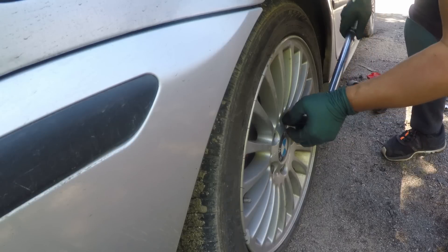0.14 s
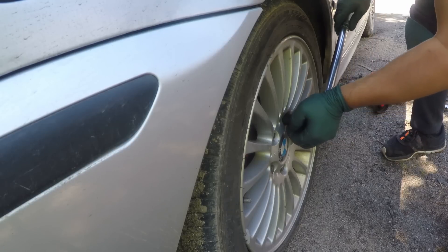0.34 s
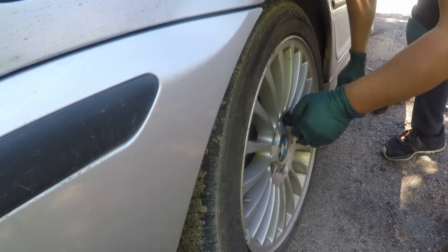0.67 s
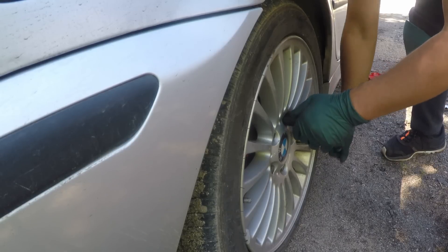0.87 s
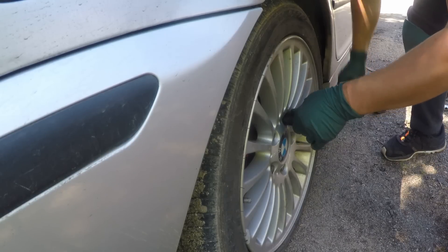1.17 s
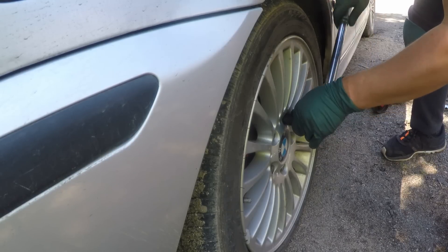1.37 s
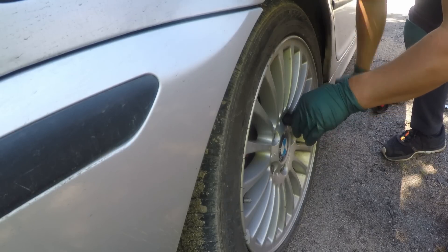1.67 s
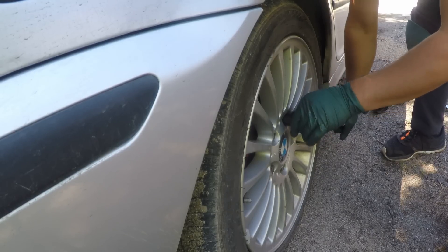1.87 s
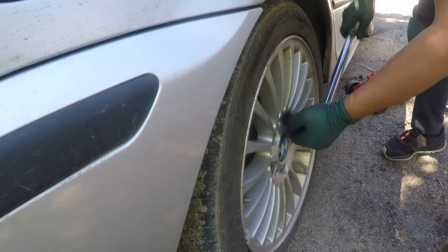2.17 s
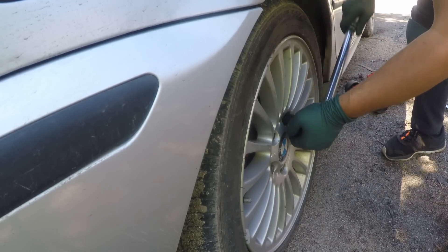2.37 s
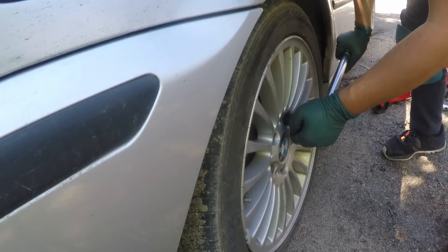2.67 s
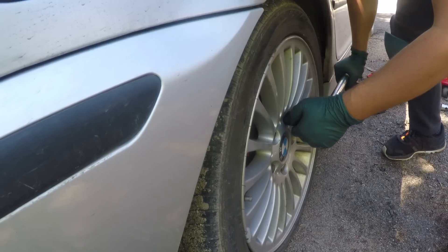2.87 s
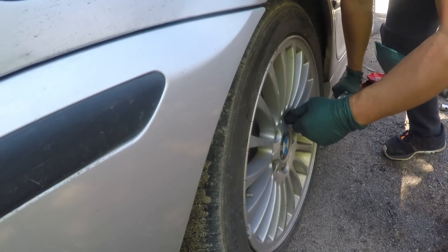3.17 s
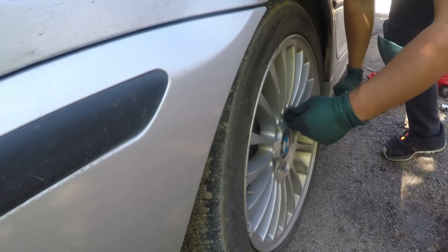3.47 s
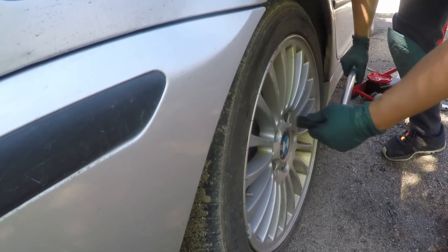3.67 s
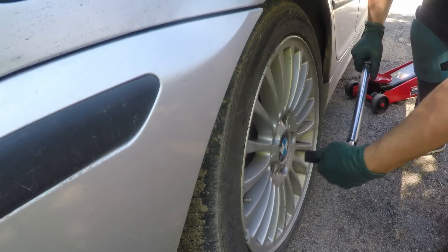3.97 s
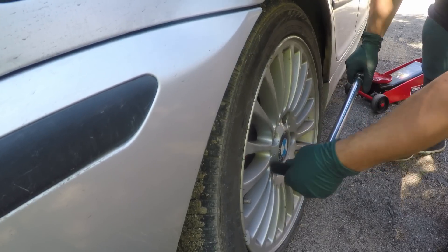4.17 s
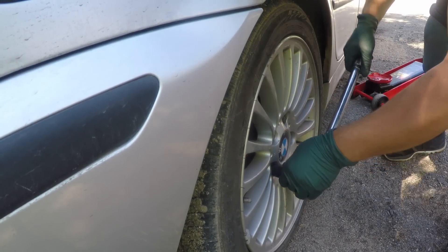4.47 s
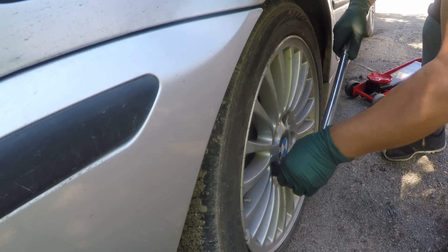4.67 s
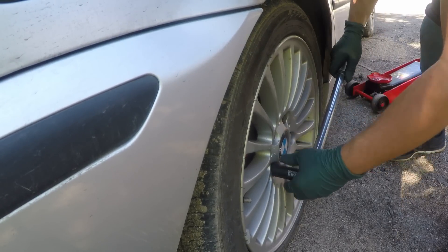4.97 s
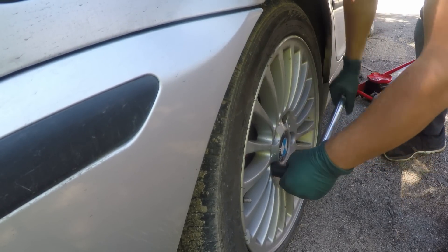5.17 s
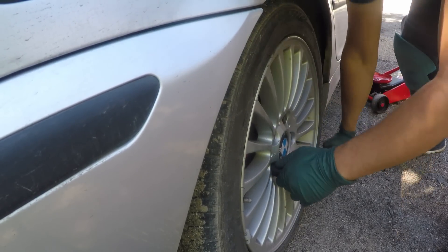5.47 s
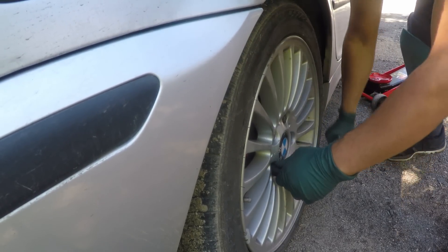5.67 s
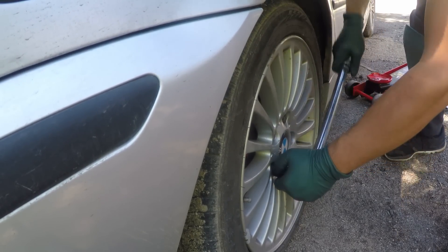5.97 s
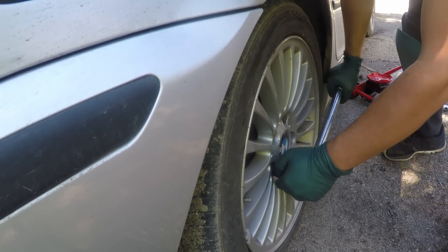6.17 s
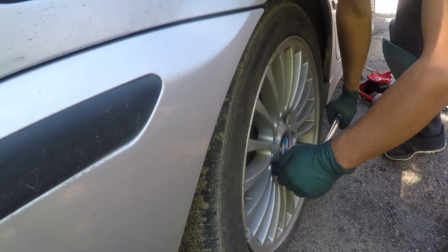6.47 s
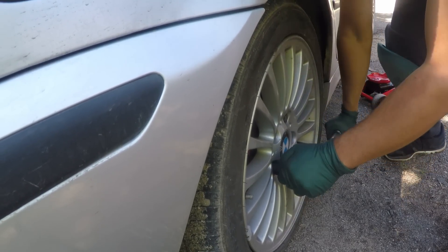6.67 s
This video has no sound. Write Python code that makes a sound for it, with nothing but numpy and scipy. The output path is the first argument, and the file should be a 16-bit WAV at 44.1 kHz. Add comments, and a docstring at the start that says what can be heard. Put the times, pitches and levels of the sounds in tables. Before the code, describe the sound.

A wrench ratchets in crisp steel tick bursts on wheel bolts, then snaps hard twice per bolt, over a distant engine outdoors.

```python
"""Ratchet ticks come first, over a distant engine and soft outdoor air: wheel bolts are being tightened.
Each tick is a noisy steel slap plus a ringing tool head and socket; the socket also knocks in the alloy wheel.
At the set torque the wrench snaps over, then snaps back: a burst of noise that rings tool, hub and tyre.
Some way off a vehicle speeds up, eases and goes by: sine tones tied to engine speed, and swelling noise.
A bird calls faintly in short falling whistles, and a thin hum wavers behind the engine."""
import sys
import numpy as np
from scipy import signal
from scipy.fft import rfft, irfft, next_fast_len
from scipy.io import wavfile
from scipy.ndimage import uniform_filter1d

SR = 44100
rng = np.random.default_rng(int(sys.argv[2]) if len(sys.argv) > 2 else 0)


def dump(signal):
    """Clip the signal to [-1, 1] and save it as 16-bit WAV at the path in sys.argv[1]."""
    limited = np.clip(np.atleast_2d(signal).T, -1, 1)
    pcm = np.round(limited * 32767).astype(np.int16)
    wavfile.write(sys.argv[1], SR, pcm)


N = 301203
TIME = np.arange(N) / SR  # the whole scene [s]
RING = np.arange(SR // 3) / SR  # time within one short sound [s]


def undb(db):
    """Turn decibels into gain."""
    return 10 ** (np.asarray(db) / 20)


def unit(x):
    """Scale to an rms (average strength) of 1."""
    return x / np.sqrt(np.mean(x ** 2))


def add(track, at, sound):
    """Mix a sound in at a time in seconds."""
    i = int(np.clip(at * SR, 0, N - 1))
    track[i:i + len(sound)] += sound[:N - i]


def colour(x, points, tilt_db=0):
    """Filter through (Hz, dB) points, tilted about 4096 Hz by tilt_db per octave, with no sound before its cause."""
    n = 2 * next_fast_len(len(x))
    octave = np.log2(np.maximum(np.arange(n // 2 + 1) * SR / n, 1))
    hz, db = np.transpose(points)
    # the tilt acts from one octave below the middle to two above
    gain_db = np.interp(octave, np.log2(hz), db) + tilt_db * np.clip(octave - 12, -1, 2)
    # folding the cepstrum forward in time makes the filter minimum phase
    cepstrum = irfft(np.log(undb(gain_db)))
    cepstrum[1:n // 2] *= 2
    cepstrum[n // 2 + 1:] = 0
    response = np.exp(rfft(cepstrum))
    return irfft(rfft(x, n) * response)[:len(x)]


def fade(t, t60):
    """Die away exponentially, losing 60 dB in t60 seconds."""
    return np.exp(-np.log(1000) * np.maximum(t, 0) / t60)


def walk(rate):
    """Wander smoothly at random with rms 1, from new values drawn rate times a second."""
    k = int(SR / rate)
    steps = np.repeat(rng.standard_normal(N // k + 1), k)
    smooth = uniform_filter1d(uniform_filter1d(steps, k), k)
    return unit(smooth[:N])


def ring(modes, scatter_db=0.5, detune=0.0027, build_s=0.00055):
    """Sum fading sine tones (modes); every blow weights and detunes them a little differently."""
    hz, db, t60 = np.transpose(modes)[:, :, None]
    size, shift, phase = rng.standard_normal((len(modes), 3)).T[:, :, None]
    waves = np.sin(2 * np.pi * (hz * (1 + detune * shift) * RING + phase))
    tones = undb(db + scatter_db * size) * fade(RING, t60) * waves
    return tones.sum(0) * (1 - np.exp(-RING / build_s))


def crack(points, tilt_db, rise_s, chatter_s, t60, after_db, after_t60, ripple_db=3.5):
    """Steel chatters on steel for a moment, then its crowd of modes dies in a fast and a slower stage."""
    since = RING - chatter_s
    decay = np.hypot(fade(since, t60), undb(after_db) * fade(since, after_t60))
    envelope = np.minimum(RING / rise_s, 1) * decay
    # each contact point favours other modes
    hz = np.arange(100, 16000, 150)
    db = np.interp(hz, *np.transpose(points)) + ripple_db * rng.standard_normal(len(hz))
    burst = colour(rng.standard_normal(len(RING)) * envelope, np.transpose([hz, db]), tilt_db)
    return unit(burst) * np.sqrt(np.mean(envelope ** 2))


# tone of the outdoor noise: (frequency [Hz], level [dB])
AIR_TONE = [(12, -28.5), (20, -3), (76, -2.5), (97, -6), (132, -11.5), (183, -14), (223, -14), (263, -20.5),
            (302, -21), (511, -26.5), (940, -30), (1930, -43), (2410, -44.5), (6180, -55.5), (15000, -68)]
# air from low to high (rumble, murmur of traffic, tyre noise, hiss):
# (steady level [dB], level of the vehicle at its nearest [dB], flicker [dB])
AIR_LAYERS = [(-35.5, -34.5, 2.1), (-55, -51, 1.5), (-57, -45.5, 1.07), (-53, -56.5, 1.3)]
# the vehicle is nearest from this time, for this long; its noise grows slowly and drops fast
PASS_S, PASS_HOLD_S = 3.55, .5
APPROACH_DB_PER_S, LEAVE_DB_PER_S = 11, 28


def air():
    """Filtered noise makes rumble, far road noise and hiss; they swell as the vehicle goes by."""
    before_s = np.maximum(PASS_S - TIME, 0)
    after_s = np.maximum(TIME - PASS_S - PASS_HOLD_S, 0)
    away_db = APPROACH_DB_PER_S * before_s + LEAVE_DB_PER_S * after_s
    bands = [(260, "lowpass"), ((260, 480), "bandpass"), ((480, 880), "bandpass"), (880, "highpass")]
    out = np.zeros(N)
    for (edge_hz, kind), (steady_db, pass_db, flicker_db) in zip(bands, AIR_LAYERS):
        band = signal.butter(4, edge_hz, kind, fs=SR, output="sos")
        noise = signal.sosfilt(band, colour(rng.standard_normal(N), AIR_TONE))
        swell = np.hypot(undb(steady_db), undb(pass_db - away_db))
        out += unit(noise) * swell * undb(flicker_db * walk(6.5))
    return out


# a faint far-off hum: (time [s], pitch [Hz], level before wavering [dB])
HUM_PATH = [(0, 196.8, -58.5), (1.3, 197.5, -51), (2.501, 212, -58.5), (4.2, 220, -57), (6.83, 218, -53)]


def hum(waver_db=2):
    """One sine tone glides in pitch and wavers in level behind the engine."""
    s, hz, db = np.transpose(HUM_PATH)
    phase = 2 * np.pi * np.cumsum(np.interp(TIME, s, hz)) / SR
    level_db = np.interp(TIME, s, db) + waver_db * walk(1.7)
    return np.sqrt(2) * undb(level_db) * np.sin(phase)


# the distant engine speeds up, eases off and runs on: (time [s], firing rate [Hz])
FIRING_RATE = [(0, 65.44), (.9, 76.7), (1.75, 81.5), (2.5, 84.33), (2.9, 76.7), (3.35, 70.24), (4.2, 71.67),
               (5.7, 73.94), (6.83, 69.5)]
# its firing tone: (time [s], level before gain and flutter [dB])
FIRING_LEVEL = [(0, -34), (.55, -46), (.9, -30), (1.4, -32), (1.73, -24.5), (2.72, -28), (2.91, -19),
                (3.17, -32.5), (3.5, -22.5), (3.8, -34), (3.97, -26), (4.4, -39.5), (4.72, -31),
                (5.1, -40.5), (6.83, -38)]
# its exhaust drone at eight times the cycle rate: (time [s], level [dB])
DRONE_LEVEL = [(0, -43), (.45, -32.5), (.9, -42), (1.6, -42), (2.1, -35), (2.6, -41.5), (3.85, -38.5),
               (4.4, -45), (6.83, -54)]
# weaker engine tones: (multiple of the cycle rate, level against the drone before wavering [dB])
WEAK_ORDERS = [(3, -10.5), (7, -7), (9, -12.5), (10, -14), (16, -17)]
# a thin whine that comes and goes:
# (time at its loudest [s], half length [s], multiple of the cycle rate, level before flutter [dB])
WHINES = [(1.947, 0.18, 73.3, -58.5), (2.077, 0.19, 101, -57)]


def engine(gain_db=-1.5, waver_db=2, flutter_db=1.3):
    """Tones at multiples (orders) of the cycle rate glide together with the engine speed."""
    firing_hz = np.interp(TIME, *np.transpose(FIRING_RATE))
    cycle = 2 * np.pi * np.cumsum(firing_hz) / SR / 5  # five firings per cycle
    firing_db = np.interp(TIME, *np.transpose(FIRING_LEVEL)) + gain_db + flutter_db * walk(11)
    drone_db = np.interp(TIME, *np.transpose(DRONE_LEVEL))
    out = undb(firing_db) * np.sin(5 * cycle) + undb(drone_db) * np.sin(8 * cycle)
    for order, order_db in WEAK_ORDERS:
        level_db = drone_db + order_db + waver_db * walk(4.6)
        out += undb(level_db) * np.sin(order * cycle + 2 * np.pi * rng.random())
    for at, half_s, order, db in WHINES:
        swell = np.exp(-((TIME - at) / half_s) ** 2)
        level = undb(db + 2 * flutter_db * walk(30))
        out += level * swell * np.sin(order * cycle + walk(40))  # the wandering phase roughens it
    return np.sqrt(2) * out


# bird whistles: (time [s], length [s], start pitch [Hz], end pitch [Hz], level before flutter [dB])
WHISTLES = [(0.849, 0.087, 5350, 4630, -61), (0.887, 0.09, 4850, 3650, -62),
            (1.058, 0.044, 3500, 2880, -57)]


def bird(flutter_db=4):
    """Each whistle is a short sine tone that falls in pitch and flutters in level."""
    out = np.zeros(N)
    for at, length_s, start_hz, end_hz, db in WHISTLES:
        hz = np.linspace(start_hz, end_hz, int(length_s * SR))
        whistle = np.sin(2 * np.pi * np.cumsum(hz) / SR)
        add(out, at, undb(db) * np.hanning(len(hz)) * whistle)
    return out * undb(flutter_db * walk(121.2))


# tone of light contacts and knocks: (frequency [Hz], level [dB])
KNOCK_TONE = [(200, -11), (700, -8.5), (1100, 3.5), (2000, 0.5), (3200, 1), (5000, -5), (7500, -17.5),
              (10500, -23), (14500, -26)]
# the tool shifting and scraping in the glove: (time [s], level [dB], length of the chatter [s])
TOOL_TAPS = [(0.387, -50.5, .002), (1.556, -45, 0.0054), (2.429, -47.5, 0.0021), (3.651, -46.5, 0.0037),
             (3.7384, -41, .002), (4.0606, -41, .003), (5.438, -54.5, 0.022), (5.465, -50.5, .014),
             (5.702, -51, 0.016), (6.0047, -49, .002), (6.1934, -46.5, 0.0042), (6.536, -56, 0.025)]


def taps():
    """The tool shifts lightly between strokes: quiet bursts of contact noise."""
    out = np.zeros(N)
    for at, db, length_s in TOOL_TAPS:
        tap = crack(KNOCK_TONE, tilt_db=0.0, rise_s=0.0007, chatter_s=length_s,
                    t60=0.035, after_db=-6.5, after_t60=0.19)
        add(out, at, undb(db) * tap)
    return out


# modes of the socket seated on its bolt: (frequency [Hz], level [dB], t60 [s])
SOCKET_MODES = [(1015, 2, 0.041), (1183, -5.5, 0.17), (1580, 0, 0.059), (2270, -12, 0.074),
                (3070, -10, 0.039), (3260, -9, 0.045)]
# modes of the alloy wheel: (frequency [Hz], level [dB], t60 [s])
WHEEL_MODES = [(175, -6, 0.045), (424, -7, 0.063), (535, -2.5, 0.051), (590, 1, 0.034), (653, -9, .09)]
# thud of the tyre, also used by the snaps: (frequency [Hz], level [dB], t60 [s])
TYRE_MODES = [(73.5, -0.5, 0.25)]
# the socket knocking on a bolt head: (time [s], level [dB], brightness [dB per octave],
# socket ring [dB], wheel ring [dB], tyre thud [dB]); the last three are relative to the level
SOCKET_KNOCKS = [(0.2287, -24.5, 2.5, -3, -3.5, -8), (.2400, -26, -20, -16, -9, -20),
                 (0.2472, -31.5, 1.5, -4, -23, -12), (3.0648, -32.5, 4.5, 3.5, -15, 6),
                 (3.0734, -28, 2, 2.5, -21.5, 1), (4.0839, -28, 5, 3, -15, -14),
                 (4.094, -26, 0, -4, -17, -13), (4.2273, -25, 7.5, -22, -29, -21),
                 (4.2480, -37.5, -9, -1, 1, -10), (4.7420, -19.5, 4, -25, -4.5, 4),
                 (4.747, -29, 8, -1, 3, 2), (4.7573, -24, 4, -12, -3, -2)]


def knocks():
    """The loose socket takes up its play on the bolt, ringing itself, the wheel and the tyre."""
    out = np.zeros(N)
    for at, db, tilt_db, socket_db, wheel_db, tyre_db in SOCKET_KNOCKS:
        blow = crack(KNOCK_TONE, tilt_db, rise_s=0.0015, chatter_s=0.00098,
                     t60=0.041, after_db=-1.5, after_t60=0.045)
        socket = undb(socket_db) * ring(SOCKET_MODES)
        wheel = undb(wheel_db) * ring(WHEEL_MODES)
        tyre = undb(tyre_db) * ring(TYRE_MODES, build_s=.005)
        add(out, at, undb(db) * (blow + socket + wheel + tyre))
    return out


# tone of the snap: (frequency [Hz], level [dB])
SNAP_TONE = [(150, -13), (320, 2), (750, -12.5), (1300, -8.5), (2000, 1), (2700, -2), (4200, 6),
             (6000, -2.5), (8500, -3), (9600, -6), (11000, -13.5), (13000, -5), (15000, -10.5)]
# modes of the steel tube of the wrench: (frequency [Hz], level [dB], t60 [s])
TUBE_MODES = [(3450, -15.5, .06), (4050, -10, .04), (4217, -8, .04), (4360, -4, 0.06), (4330, -27, .16),
              (4560, -28, 0.2), (5650, -21.5, .08), (5560, -11.5, 0.078), (6700, -14.5, 0.051),
              (7440, -16.5, 0.045), (7800, -31.5, 0.16), (8350, -21.5, 0.056), (7800, -35, .2),
              (8400, -16.5, 0.084), (13400, -24, 0.054), (14790, -30.5, .05)]
# modes of the square drive: (frequency [Hz], level [dB], t60 [s])
DRIVE_MODES = [(6280, 1, 0.18), (6400, -1.5, .13), (6450, -3, .11)]
# mode of the torque spring: (frequency [Hz], level [dB], t60 [s])
SPRING_MODES = [(12810, 1, 0.08)]
# modes of hub and suspension: (frequency [Hz], level [dB], t60 [s])
HUB_MODES = [(198, -13.5, 0.065), (309, 1.5, 0.055), (426, -4.5, 0.12), (577, -9, .11), (938, -0.5, 0.033)]
# the torque mechanism snapping: (time [s], level [dB], chatter length [s], brightness [dB per octave],
# tube ring [dB], drive ring [dB], spring ring [dB], socket pitch [Hz], socket ring [dB],
# hub ring [dB], tyre thud [dB]); rings and thud are relative to the level
TORQUE_SNAPS = [(3.1965, -7, 0.0061, 0.5, -6, -21.5, -24, 1967, -3.5, -11, -16.5),
                (3.479, -12, 0.0059, -2.5, -24, -30, -16.5, 1517, -4.5, -10, 0),
                (6.5905, -8, 0.0057, 0.5, 0.5, -29, -17, 2210, 2, -12, -30),
                (6.8255, -12.5, 0.0033, -2.5, 9.5, -26, -25, 1594, -18.5, -13.5, -20)]


def snaps(socket_t60=0.035):
    """The toggle trips and hits the tube; the jolt runs through socket and hub into the tyre."""
    out = np.zeros(N)
    for (at, db, chatter_s, tilt_db, tube_db, drive_db, spring_db,
         socket_hz, socket_db, hub_db, tyre_db) in TORQUE_SNAPS:
        blow = crack(SNAP_TONE, tilt_db, rise_s=0.002, chatter_s=chatter_s,
                     t60=0.0051, after_db=-6.0, after_t60=0.052, ripple_db=2.0)
        tube = undb(tube_db) * ring(TUBE_MODES)
        drive = undb(drive_db) * ring(DRIVE_MODES)
        spring = undb(spring_db) * ring(SPRING_MODES)
        # the pitch of the socket depends on how it sits on the bolt
        socket = ring([(socket_hz, socket_db, socket_t60)])
        hub = undb(hub_db) * ring(HUB_MODES, build_s=0.0007)
        tyre = undb(tyre_db) * ring(TYRE_MODES, build_s=0.002)
        add(out, at, undb(db) * (blow + tube + drive + spring + socket + hub + tyre))
    return out


# tone of the pawl, the sprung catch in the ratchet: (frequency [Hz], level [dB])
PAWL_TONE = [(400, -22), (1100, -17), (1600, -4), (2400, -2.5), (3100, 3), (5200, -3), (7500, -9),
             (10000, -11.5), (13000, -11), (15000, -15)]
# modes of the ratchet head: (frequency [Hz], level [dB], t60 [s])
HEAD_MODES = [(1823, -19, 0.063), (2207, -15, 0.027), (2970, -8, 0.07), (3376, -4.5, 0.024),
              (3860, -35, 0.016), (4790, -3.5, 0.024), (5230, -4.5, 0.042), (6030, -10.5, 0.045),
              (7200, -8.5, 0.032), (8270, -8, 0.043), (12200, -33, 0.037), (12800, -14, 0.028)]
# back swings of the handle, one tick per tooth: (time [s], teeth, time per tooth [s],
# time lost as the hand brakes, negative if it hurries [s], level before gain [dB],
# rise from first tooth to last [dB], brightness [dB per octave], socket pitch [Hz])
BACK_SWINGS = [(0.0302, 3, .1031, .0352, -22, 0, 0.5, 2930),
               (1.1226, 9, .0287, .0276, -20.5, 0.5, 1.5, 2210), (2.0659, 6, .0311, .0245, -20, 4, 2, 3000),
               (4.1028, 7, .0299, .0179, -20, 1, 0.7, 3250), (4.3923, 5, .0411, -.0309, -21, -1, 0, 2980),
               (4.6069, 1, .03, 0, -22, -1, 0, 3160), (4.6333, 2, .087, 0, -27.5, 3, -12, 2600),
               (5.7714, 5, .0272, .0214, -19.5, -1, 0, 3200)]
BRAKE_POWER = 4  # high: the pace stays nearly even until the swing ends
# no two teeth drop alike: spread of level, and of brightness per octave
TOOTH_SCATTER_DB, TOOTH_TILT_DB = 0.5, 1.0
HEAD_DB, HEAD_SCATTER_DB = -0.6, 4  # ring of the head against the slap, and its spread
SEAT_DB, SEAT_T60_S = -3.5, 0.028  # ring of the socket, at a pitch set by how it sits on the bolt


def ratchet(gain_db=-4, lead_s=0.00038, slide_db=-20, slide_s=0.003):
    """The sprung pawl slides off each tooth, slaps into the gap and rings the head and socket."""
    out = np.zeros(N)
    for start, teeth, tooth_s, brake_s, swing_db, rise_db, swing_tilt_db, socket_hz in BACK_SWINGS:
        along = np.linspace(0, 1, teeth)
        times = start + tooth_s * np.arange(teeth) + brake_s * along ** BRAKE_POWER
        levels = swing_db + gain_db + rise_db * (along - .5)
        chances = rng.standard_normal((teeth, 3))
        for at, db, (force, edge, contact) in zip(times, levels, chances):
            tilt_db = swing_tilt_db + TOOTH_TILT_DB * edge
            slide = crack(PAWL_TONE, tilt_db, rise_s=0.0036, chatter_s=.004,
                          t60=.01, after_db=-9, after_t60=.03)
            slap = crack(PAWL_TONE, tilt_db, rise_s=0.0018, chatter_s=0.0013,
                         t60=0.023, after_db=-4.5, after_t60=0.065)
            head = ring(HEAD_MODES, scatter_db=4, detune=.022)
            socket = ring([(socket_hz, SEAT_DB, SEAT_T60_S)], scatter_db=3, detune=.035)
            tick = slap + socket + undb(HEAD_DB + HEAD_SCATTER_DB * contact) * head
            # the spring's energy is shared between slap and rings, so they add no strength
            tick = unit(tick) * slap.std()
            add(out, at - slide_s, undb(db + slide_db) * slide)
            add(out, at - lead_s, undb(db + TOOTH_SCATTER_DB * force) * tick)
    return out


# tone of the echoes: (frequency [Hz], level [dB])
ECHO_TONE = [(100, -3.5), (1000, 9), (4500, -8), (9000, -3), (10500, -13.5), (15000, -2)]


def yard(x, wet_db=-28, early_db=-22, early_t60=0.089, late_t60=.42, delay_s=0.008):
    """Car body and ground scatter the sound in a short echo; walls further off add a thin tail."""
    onset = np.clip(RING / delay_s - 1, 0, 1)  # silent for delay_s, then rising as long again

    def echo(t60):
        """Fading coloured noise stands for many small reflections."""
        return unit(colour(rng.standard_normal(len(RING)) * onset * fade(RING, t60), ECHO_TONE))

    response = undb(early_db) * echo(early_t60) + undb(wet_db) * echo(late_t60)
    return x + signal.fftconvolve(x, response / np.sqrt(len(RING)))[:N]


def scene():
    """The tool and the bird sound in the yard, over engine, hum and air."""
    background = air() + hum() + engine()
    in_yard = bird() + taps() + knocks() + snaps() + ratchet()
    return (background + yard(in_yard))[None]


def record(dry):
    """Soft overload rounds the loudest peaks, then a steep filter cuts the very top."""
    rounded = dry / (1 + dry ** 6) ** (1 / 6)
    top_cut = signal.ellip(10, .2, 85, 15150, fs=SR, output="sos")  # edge at 15150 Hz
    return signal.sosfilt(top_cut, rounded)


dry = scene()
out = record(dry)
dump(out)
```